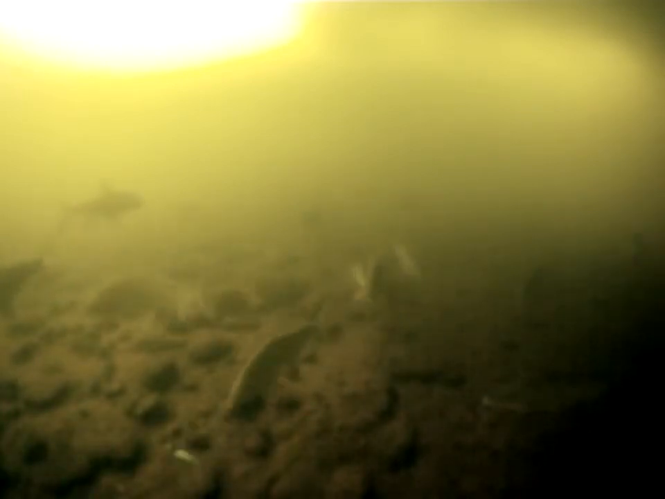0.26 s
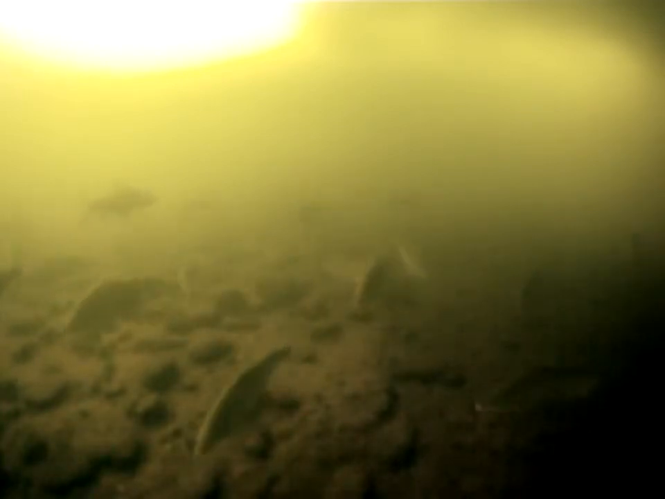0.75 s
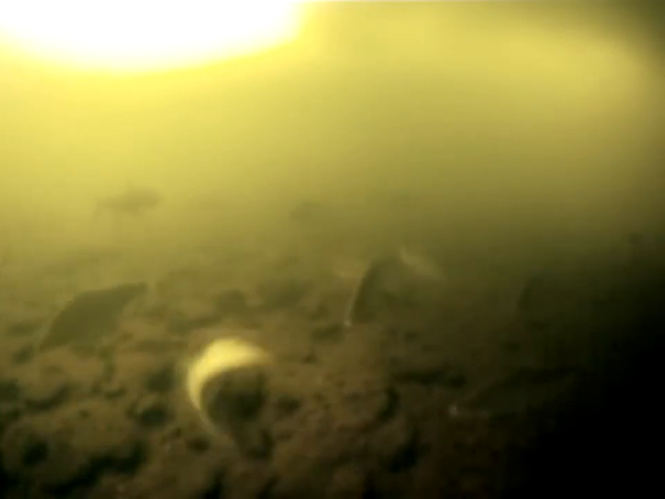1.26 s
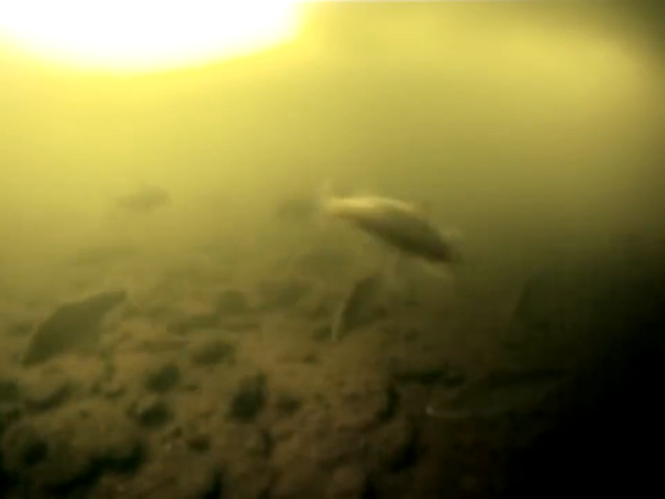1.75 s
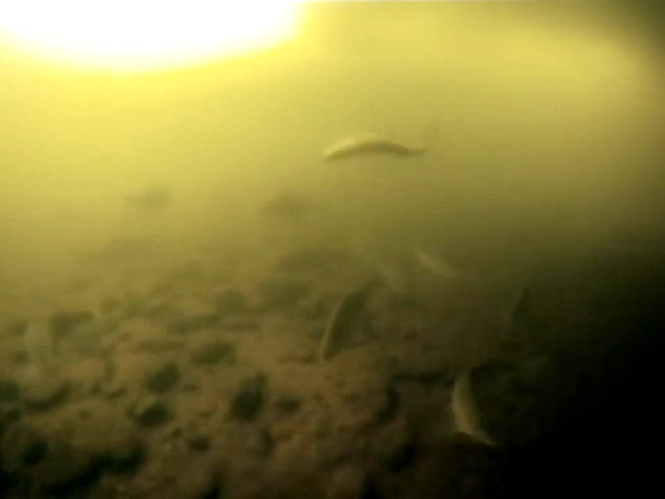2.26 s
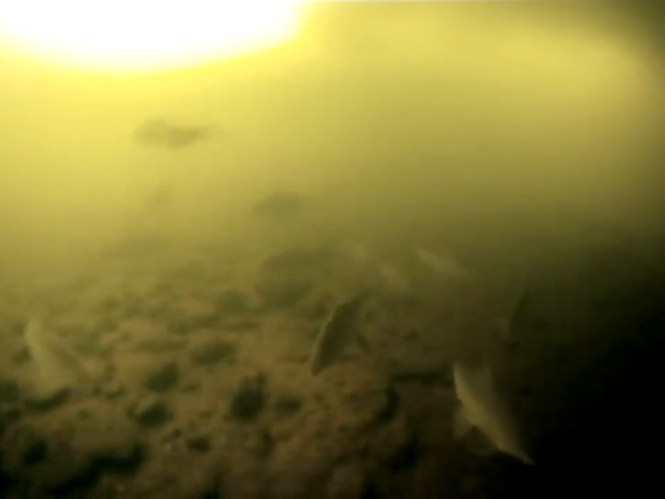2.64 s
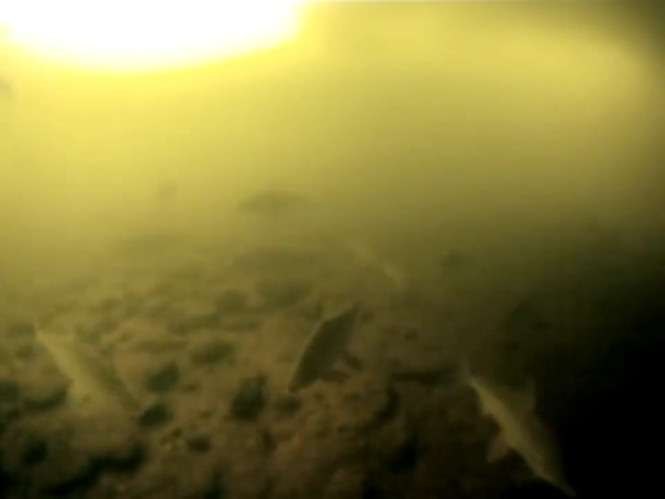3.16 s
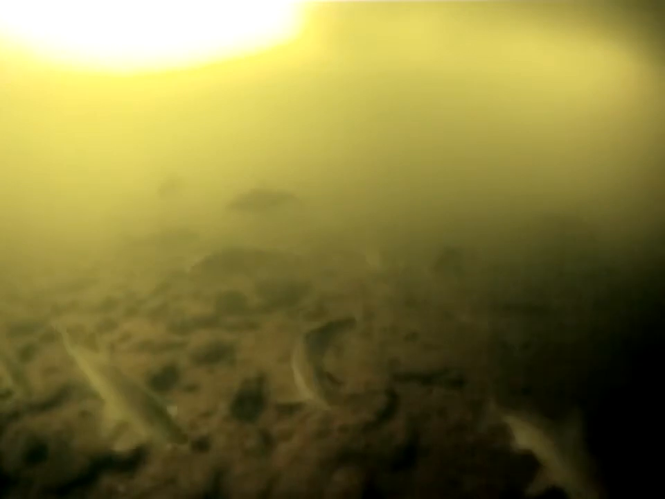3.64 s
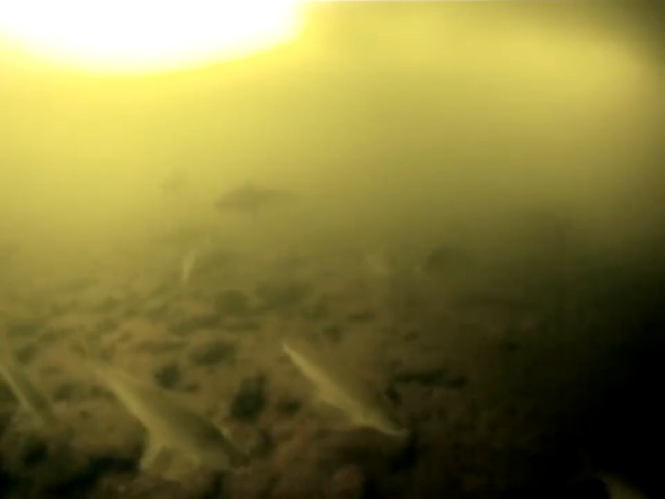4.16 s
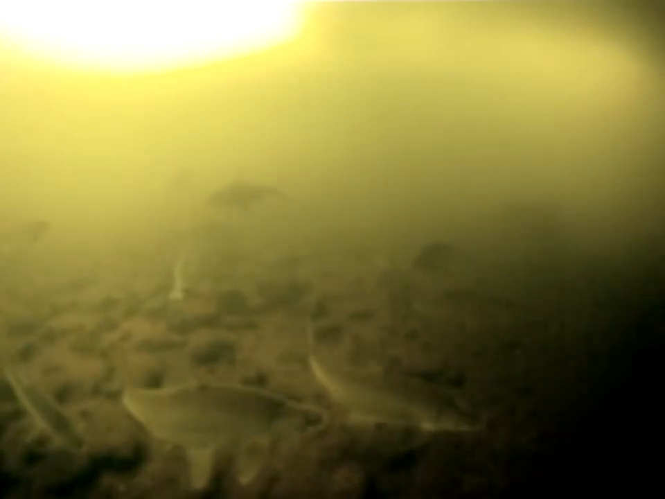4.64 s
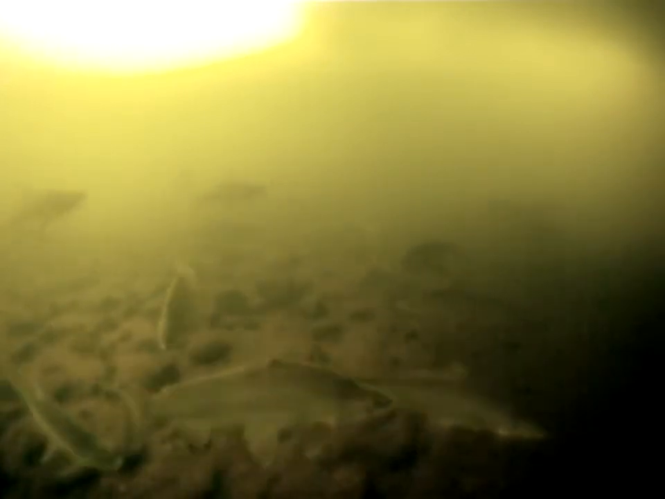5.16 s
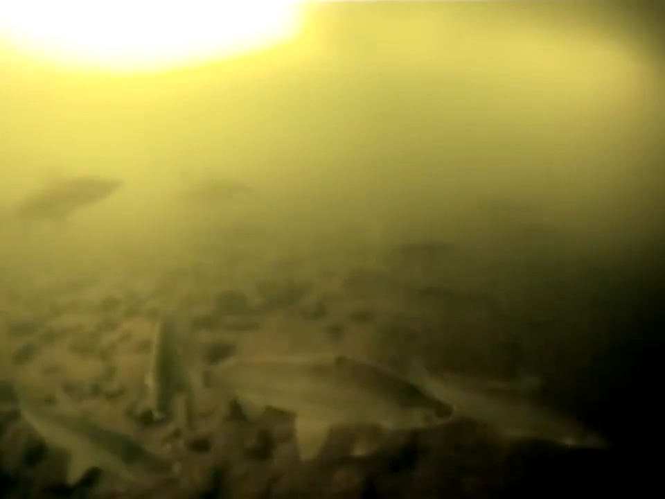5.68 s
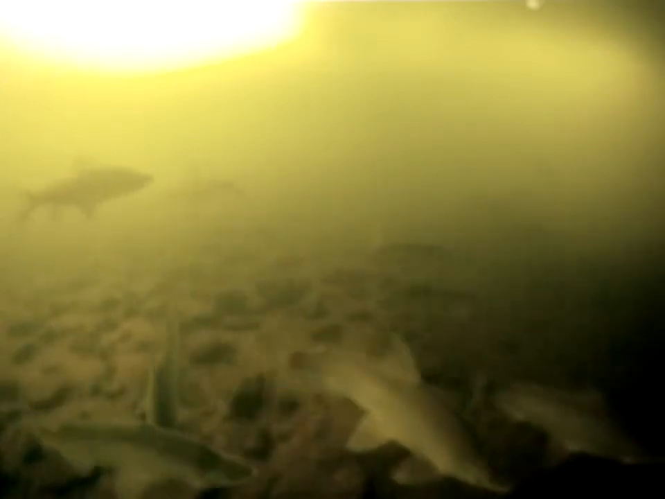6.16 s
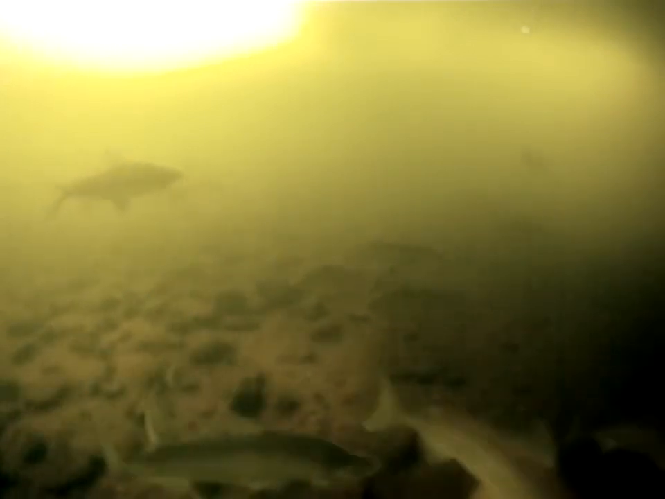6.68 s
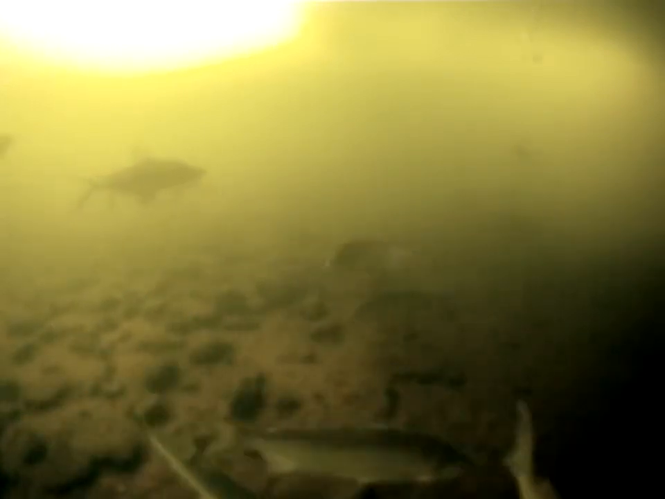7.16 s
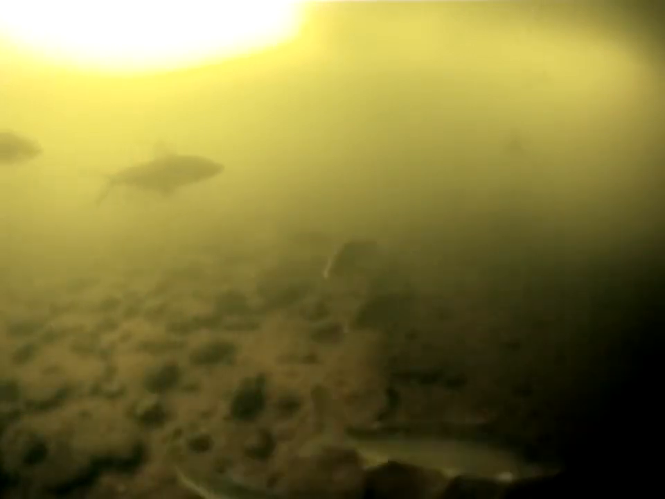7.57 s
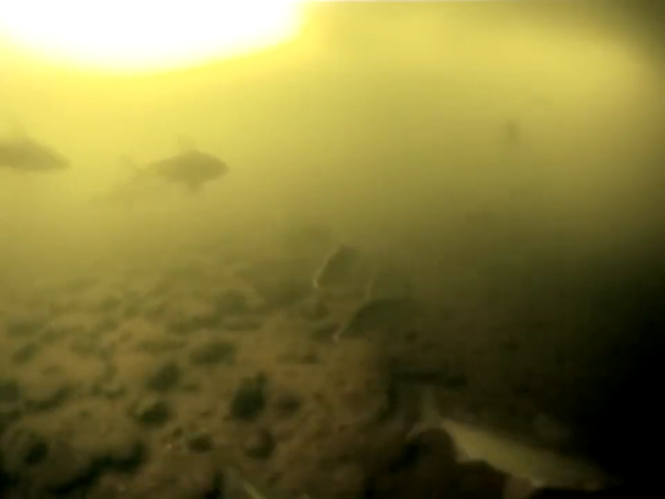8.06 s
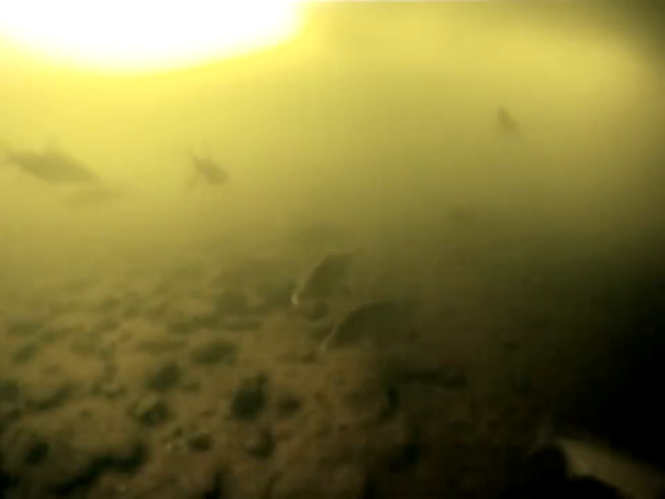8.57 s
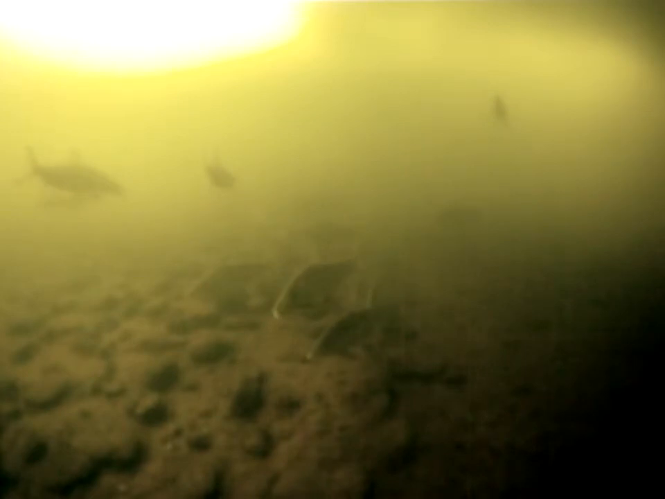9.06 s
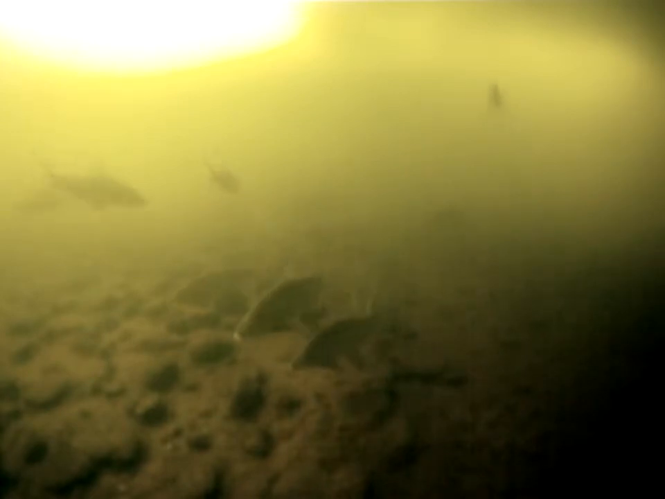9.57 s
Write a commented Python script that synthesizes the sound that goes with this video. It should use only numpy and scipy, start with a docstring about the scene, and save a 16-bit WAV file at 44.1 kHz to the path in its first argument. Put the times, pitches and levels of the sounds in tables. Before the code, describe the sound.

Underwater beneath ice, faint ticks and soft hollow bumps sound over a quiet hiss. Water briefly gurgles and slops with low thuds, then settles. From about halfway, a cable knocks against a plastic housing in an irregular run of loud, sharp clicks, with light scrapes and a thin metallic ring near the end. The microphone is inside the housing, so everything sounds very close, with a gritty, lo-fi treble.

```python
"""Camera under lake ice

A small underwater camera hangs on its cable. Hard ticks and soft bumps along the cable ring its plastic
housing, water slops in the ice hole with low thuds, and the cable scrapes now and then, over preamp hiss.
The camera samples slowly and holds each sample, which mirrors every sound into the treble."""
import sys
import numpy as np
from scipy import signal
from scipy.fft import rfft, irfft
from scipy.io import wavfile
from scipy.ndimage import uniform_filter1d

SR = 44100
rng = np.random.default_rng(int(sys.argv[2]) if len(sys.argv) > 2 else 0)


def bounce(signal):
    """Save signal as a 16-bit WAV file at the path given by the first command-line argument."""
    frames = np.transpose(np.atleast_2d(signal))
    limited = np.clip(frames, -1, 1)
    pcm = np.round(limited * 32767).astype(np.int16)
    wavfile.write(sys.argv[1], SR, pcm)


N = 433048
TIME = np.arange(N) / SR

# The modes, or natural tones, of each part of the housing:
# (pitch [Hz], level [dB], ring time [s], size and direction of the first swing [factor])
SHELL = [(2004, -3, 0.019, -0.69), (2195, 11, 0.01, 1), (2050, -10, 0.017, 0.31)]
PLATE = [(1348, 0, .0098, -1), (1095, -11, .0102, -1), (1770, -15, .009, -1), (830, -19, .009, 1)]
LENS = [(2835, -4, 0.0062, 0.4), (3075, -3.5, 0.0063, -0.53), (4200, -10, 0.0071, -0.41),
        (4940, -4, 0.005, 0.53), (5286, -3.5, 0.0032, 0.83)]
RIM = [(3550, 1.5, 0.011, -0.34), (3243, -7, 0.009, 0.98)]
CAVITY = [(699, -4, 0.026, -1.4), (612, 2.5, 0.0075, 0.87), (800, -22.5, 0.007, 0.86)]
MOUNT = [(261, 0, 0.011, -1)]
# How restless the water round the housing is: (time [s], level [dB])
WASH_LEVELS = [(0.0, -72.5), (1.37, -68), (1.5, -50), (1.78, -61), (1.97, -57), (2.11, -64.5),
               (2.51, -61.5), (3.25, -66), (4.49, -70.5), (5.3, -66.5), (5.99, -58), (6.27, -61.5),
               (6.48, -66.5), (6.9, -66), (7.22, -60.5), (7.55, -70.5), (8.56, -60.5), (9.0, -68.5),
               (9.25, -66), (9.82, -59)]


def undb(db):
    """Turn a level in dB into a gain."""
    return 10 ** (np.asarray(db, float) / 20)


def add(out, s, x):
    """Mix a short sound in at s seconds."""
    i = max(int(s * SR), 0)
    out[i:i + len(x)] += x[:N - i]


def unit(x):
    """Scale a sound to an average strength (rms) of 1."""
    return x / np.sqrt(np.mean(x ** 2))


def coloured(points):
    """Noise whose spectrum follows (frequency [Hz], level [dB]) points."""
    hz, db = np.transpose(points)
    bins = np.arange(1, N // 2 + 2) * SR / N
    gain = undb(np.interp(np.log(bins), np.log(hz), db))
    return unit(irfft(rfft(rng.standard_normal(N)) * gain, N))


def wander(per_s):
    """A curve that glides to a new random value per_s times a second."""
    step = int(SR / per_s)
    held = np.repeat(rng.standard_normal(N // step + 1), step)
    return 1.7 * uniform_filter1d(held, step)[:N]


def strays(per_s, spreads):
    """Rows of events at random times, each value drawn round its average."""
    count = int(per_s * N / SR)
    mean, spread = np.transpose(spreads)
    times = rng.random(count) * N / SR
    return np.column_stack([times, mean + spread * rng.standard_normal((count, len(mean)))])


def ring(modes, chance=np.zeros(10), push_s=0.00014, detune=0.007, scatter_db=3.0,
         bend=1.6, length=1, rise_cycles=0.5):
    """One blow on a part, with peak 1; chance nudges the level and pitch of each mode."""
    t = TIME[:SR // 6]
    x = 0
    for k, (hz, db, ring_s, swing) in enumerate(modes):
        # like a cluster of close tones, it holds, drops as they fall out of step and leaves a faint tail
        fade = undb(-60 * (t / ring_s / length) ** bend) + undb(-24 - 30 * t / ring_s)
        rise = 1 - np.exp(-hz * t / rise_cycles)
        tone = np.sin(2 * np.pi * hz * (1 + detune * chance[5 + k]) * t)
        x = x + swing * undb(db + scatter_db * chance[k]) * fade * rise * tone
    x = np.convolve(x, np.hanning(int(push_s * SR) + 3))  # a longer push is a softer contact
    return x / np.abs(x).max()


def grit(modes, grain_db=1.6, length=1):
    """A stream of tiny blows on a part; more grain_db makes it more uneven."""
    blows = rng.standard_normal(N) * undb(grain_db * wander(250))
    return unit(signal.fftconvolve(blows, ring(modes, length=length))[:N])


def water_wash():
    """Restless water gurgles round the housing and jostles its mount."""
    # The water's deep rumble: (frequency [Hz], level [dB])
    spectrum = [(15, -10.5), (30, 1.5), (60, -4.5), (110, -2.5), (200, -7.5), (350, -10), (700, -18.5),
                (1200, -34), (3000, -79)]
    wash_db = np.interp(TIME, *np.transpose(WASH_LEVELS))
    gurgle = undb(wash_db + 2 * wander(14)) * coloured(spectrum)
    jostle = undb(-49.5 + 0.5 * wash_db + 3 * wander(31)) * grit(MOUNT, 3.0)
    return gurgle + jostle


def shell_creak():
    """The plastic shell creaks faintly all the time."""
    return undb(-80 + 2.9 * wander(30)) * grit(SHELL, 2.6)


def preamp_hiss():
    """The microphone's amplifier hisses steadily."""
    # The amplifier's own noise: (frequency [Hz], level [dB])
    spectrum = [(12, -31.5), (20, -0.5), (175, -9.5), (242, -8), (702, -9), (825, -12), (1810, -14),
                (2080, -14), (2560, -16.5), (5000, -17), (6500, -27.5)]
    return undb(-64) * coloured(spectrum)


def hollow_knocks():
    """The housing's lower modes ring: soft bumps on their own, and the deep body under hard ticks."""
    # Low knocks: (time [s], cavity peak [dB], mount [dB over cavity], plate [dB over cavity],
    # cavity ring length [share of its full ring])
    knocks = [(0.141, -51.5, -4, -7, .8), (0.1702, -50, -1, -20, 0.91), (0.699, -49, -27, 3.5, 0.61),
              (0.973, -33.5, -19, -33, 1), (1.002, -33, -36, -23, .9), (1.108, -54, -20, -20, 1),
              (1.324, -32.5, -11, -15, 0.84), (1.342, -28.5, -11, -47, 0.69), (1.392, -52, 6, -16, .7),
              (1.491, -33, 2.5, -24, 0.72), (1.516, -39, 8.5, -9, 0.59), (1.619, -33, -4.5, -32, 1),
              (2.15, -46, -25, 0.5, 1), (2.612, -44.5, -16, -3.5, 0.9), (2.689, -35.5, -9.5, -28, 1),
              (2.719, -35, -21, -22, 0.72), (3.071, -48, -3, -10, 0.99), (3.116, -46, -16, -17, 0.87),
              (3.168, -46, -24, -2, .8), (3.782, -47.5, -23, -3, 0.69), (4.499, -56.5, -20, 5, .7),
              (4.874, -29.5, 1, -19, 0.47), (5.025, -44.5, -31, -2, 0.74), (5.536, -48.5, -3, -17, 0.37),
              (5.551, -55.5, 8, -11, .45), (5.571, -42.5, -3, -15.5, 0.4), (5.604, -47, -10, -2, 0.6),
              (5.748, -25.5, 8.5, -26, 0.68), (5.907, -47, 8, -25, 0.64), (6.109, -48.5, 2.5, -25, 0.76),
              (6.141, -38, -19, -28, 0.98), (6.197, -57.5, 10, 2, 0.64), (6.279, -54.5, -22, -12, 0.86),
              (6.388, -55.5, -3, -10, 0.52), (6.4144, -48, -22, -2, 0.81), (6.7, -56.5, 8, -15, 0.48),
              (6.803, -54, -12, -14, 0.56), (6.843, -56.5, -10, -14.5, 0.53), (7.065, -14, -19, -34, 0.49),
              (7.207, -47.5, 6, -12, 0.45), (7.248, -52.5, -2, -11, .6), (7.362, -46.5, 4.5, -3, 0.51),
              (7.4077, -52, 2, -11, 0.43), (7.4848, -43.5, 1.5, 0, 0.65), (7.551, -57, 2.5, -23, .7),
              (7.625, -47, -5, -32, 0.94), (7.672, -51.5, -4, -27, 0.61), (7.807, -51, 4, -25, .7),
              (7.916, -47.5, 3.5, -25, 0.53), (7.987, -43.5, -14, -2.5, 0.73), (8.098, -51.5, 4, -24, 0.56),
              (8.433, -59, 16, -23.5, .7), (8.465, -62, 22.5, 8, .7), (8.573, -35, -30, -20, 0.72),
              (8.589, -42, -14, -15.5, 0.64), (8.596, -38.5, 6.5, -3, 0.58), (8.617, -41, -18, -13, 0.94),
              (8.638, -47, -15, -15, 0.54), (8.65, -59.5, 20, -5, .7), (8.669, -56, 19.5, -5, .7),
              (8.691, -57, 15, -23.5, 0.64), (8.743, -47.5, 5, -25, .7), (8.8016, -45.5, -5, -5, 0.64),
              (8.823, -42.5, -31, -2, 1), (8.875, -51, 1, -11, .7), (9.326, -46, 2.5, -7, 0.45),
              (9.339, -44, 10, -11, .7), (9.504, -44, 8, -1.5, 1), (9.6735, -53, 9, 4, 0.6),
              (9.71, -53.5, 8.5, 3.5, 0.63)]
    out = np.zeros(N)
    for s, db, mount_db, plate_db, length in knocks:
        chance = rng.standard_normal((3, 10))
        cavity = ring(CAVITY, chance[0], push_s=0.0016, detune=0.023, rise_cycles=1, length=length)
        mount = ring(MOUNT, chance[1], push_s=0.0026, detune=0.033)
        plate = ring(PLATE, chance[2], push_s=0.00089, detune=0.0068, scatter_db=9.5)
        add(out, s, undb(db) * cavity)
        add(out, s, undb(db + mount_db) * mount)
        add(out, s, undb(db + plate_db) * plate)
    return out


def hard_ticks(slide_s=0.0035, rattle_s=0.028, buzz_s=0.062, fizz_s=0.04, linger_s=0.14):
    """Each tick rings the housing, slides on for a moment and leaves loose parts rattling faintly."""
    # Ticks: (time [s], shell peak [dB], then plate, lens, rim and collar [dB over shell])
    ticks = [(0.474, -54, -24, -20, -26, -20), (0.901, -40.5, -34, -30, -32, -13),
             (1.153, -50.5, -9, -5, -13, -20), (1.369, -53, -24, -20, -26, -20),
             (1.392, -53.5, -20, 5, -5, -20), (1.421, -46, 0.5, -6, -16, 7), (1.4925, -43.5, -8, 0, -2, -4),
             (1.558, -52, -24, -17, -26, -20), (1.605, -40, -18, -24, -28, -14),
             (1.69, -52, -16, -10, -24, -16), (1.743, -41.5, -8, -2.5, -14, -11),
             (1.756, -37, -7, -7.5, -16, -5.5), (1.928, -44, -34, -11, -14, -27),
             (2.183, -53, -20, -14, -18, -20), (2.531, -40.5, -10, -9, -23, -4.5),
             (2.72, -52.5, -12, -12, -24, -20), (2.792, -50.5, -25, -20, -24, -20),
             (2.984, -45.5, 1, -5, -3.5, -20), (3.525, -32.5, -12.5, -3.5, -10, -27),
             (3.6783, -49.5, -27, -6, -17, -22), (3.945, -51.5, -18, -7, -15, -20),
             (4.401, -55, -24, -18, -26, -24), (4.786, -54.5, -24, -20, -26, -25),
             (4.908, -37, -8.5, 4, 3.5, -18), (4.9121, -6.5, -5.5, -12, -18, -23),
             (4.927, -32, -6.5, 0, -1.5, -12), (5.27, -54, -13.5, -7, -10.5, -20),
             (5.7472, -2.5, 7, 6, -21, -17), (5.8686, -45, -1, 3, 5, -13), (5.893, -42, -11, -3, 8, -20),
             (5.906, -4, -16, -6, -4.5, -25), (5.9668, -48, -3, -3, -5, -20),
             (5.9794, -37, -11, -12, -24, -11), (6.0069, -46.5, 3.5, -20, -24, -4),
             (6.0723, -51, 0.5, -9, -14, -14), (6.1087, -16, -9.5, 3.5, -1, -23),
             (6.2133, -54.5, -3, 10, 1, -11), (6.2966, -50.5, -19, -7, -14.5, -20),
             (6.4368, -36.5, -21, -32, -30, -24), (6.4772, -35, -22, -16, -9, -2),
             (6.5253, -48.5, -23, -22.5, -24, -20), (7.039, -53, -14, -6, -8.5, -20),
             (7.0647, -3.5, 3, -0.5, -6.5, -8), (7.08, -10, -7.5, -10.5, -13.5, -24),
             (7.2205, -51, -26, 11, 16, -20), (7.362, -35, -20, 1.5, -7, -22),
             (7.4879, -27.5, -10, -3, -19, -25), (7.497, -47, 0, 2, -10, -13),
             (7.5504, -37, -11, 1.5, -15, -9), (7.618, -50, -9, 10, 0, -14),
             (7.6244, -22, -24, 0.5, -30, -35), (7.672, -34, -24, 2, -12, -19.5),
             (7.8061, -5.5, -10, -14.5, -20, -28), (7.8153, -11, -10, -11.5, -17.5, -24.5),
             (7.9155, -19, -18.5, -6.5, -12.5, -37), (7.96, -49, -3, -8, -8, -14),
             (8.0565, -40.5, -26, -2, -1.5, -24), (8.0972, -14, -14, -10, -14.5, -36),
             (8.162, -47.5, -25, -9, -11, -24), (8.196, -44, -18, -20, -25, -14),
             (8.2228, -39, -12, -1, -10, -12), (8.2629, -38.5, -10, -4.5, -13, -19.5),
             (8.4326, -8.5, -8, -8.5, -14, -28), (8.566, -49.5, 4, -2.5, -4, -16),
             (8.5734, -23, -18, -13, -10, -14), (8.5905, -43, -16.5, -15, -12, -20),
             (8.596, -36, -11, -17, -18, -16), (8.6195, -41, -8, -8, -7, -20),
             (8.6607, -37.5, -18, -6, -8, -20), (8.6665, -49, -16, -6, -10, -20),
             (8.6887, -10, -13, -3, -7, -40), (8.742, -29.5, -11, -0.5, -8, -11),
             (8.8025, -47, -10.5, -5, -13.5, -16), (9.2439, -49.5, -8.5, 2, -12, -12),
             (9.3327, -37, -24, -7.5, -16, -12), (9.5027, -34, -14, -4, -12, -9),
             (9.5606, -43, -3, -12, -16, -13)]
    # The same five levels for faint ticks at random times: (average [dB], spread [dB])
    faint_levels = [(-64, 2), (-16, 5), (-12, 5), (-20, 5), (-18, 4)]
    # Modes of the collar and of the shell's lingering ring:
    # (pitch [Hz], level [dB], ring time [s], first swing [factor])
    collar_modes = [(1547, 0, 0.018, -1)]
    linger_modes = [(2210, -0.5, 0.022, 0.95), (2060, -5, 0.02, 0.89)]
    blows = np.zeros(N)
    shake, shine, buzz, fizz, linger = np.zeros((5, N))  # loudness curves of the after-sounds
    t = TIME[:SR // 2]
    slide = t / slide_s * np.exp(1 - t / slide_s)
    for s, db, plate_db, lens_db, rim_db, collar_db in np.vstack([ticks, strays(1.2, faint_levels)]):
        chance = rng.standard_normal((7, 10))
        cavity = ring(CAVITY, chance[3], bend=3.5, length=0.59)
        mount = ring(MOUNT, chance[4], detune=0.07)
        cavity_db = -20.5 + 0.57 * plate_db  # a tick on the plate also reaches the cavity behind it
        blow = (ring(SHELL, chance[0])
                + undb(plate_db) * ring(PLATE, chance[1], bend=3.5)
                + undb(lens_db) * ring(LENS, chance[2])
                + undb(rim_db) * ring(RIM, chance[5])
                + undb(collar_db) * ring(collar_modes, chance[6], detune=0.021)
                + undb(cavity_db) * (cavity + undb(-21) * mount))
        add(blows, s, undb(db) * blow)
        slide_db = min(-32 - 0.5 * db, -14)  # harder ticks slide less for their size
        loose = undb(db + slide_db) * slide + undb(db - 49) * np.exp(-t / rattle_s)
        add(shake, s, loose)
        add(shine, s, undb(0.44 * max(lens_db, rim_db)) * loose)  # brighter if lens or rim is hit
        add(buzz, s, undb(db + plate_db - 56) * np.exp(-t / buzz_s))  # the plate buzzes on, lower
        add(fizz, s, undb(db + rim_db - 47) * np.exp(-t / fizz_s))  # the rim fizzes on, higher
        add(linger, s, undb(db - 56.5) * np.exp(-t / linger_s))
    rattle = grit(SHELL) + undb(-5) * grit(PLATE)
    bright = grit(LENS[:2]) + undb(-7) * grit(RIM, length=0.75) + undb(-13) * grit(LENS[2:])
    plate_grit = rattle + undb(2.5) * grit(PLATE) + undb(-3) * (grit(CAVITY) + grit(LENS[:2]))
    rim_grit = grit(RIM, 2.0, length=0.6) + undb(-2) * grit(LENS[2:3], 2.5, length=0.45)
    bass_cut = signal.butter(2, 330, "high", fs=SR, output="sos")  # the ticks carry no deep bass
    return (signal.sosfilt(bass_cut, blows) + shake * rattle + undb(-7) * shine * bright
            + buzz * plate_grit + fizz * rim_grit + linger * grit(linger_modes, 0))


def water_slops(glide=0.07, hum_cycles=2.9):
    """A pocket of air under the ice swings up and dies in a few cycles, with two weaker tones above."""
    # Slops in the ice hole: (time of the crest [s], level [dB], pitch [Hz])
    slops = [(1.13, -52, 170), (1.152, -58, 121), (1.367, -48, 99), (1.528, -33, 138), (1.58, -35, 72),
             (1.599, -26.5, 102), (1.691, -36.5, 100), (1.811, -38, 94.5), (1.887, -38, 72),
             (1.934, -48, 110), (1.959, -39.5, 74), (2.074, -44.5, 69), (2.132, -42, 99), (2.252, -47, 101),
             (2.351, -42.5, 93), (2.418, -49.5, 83), (2.495, -48, 100), (2.551, -48, 118), (2.622, -47, 94),
             (2.666, -50, 110), (2.832, -49, 89), (2.949, -47, 107), (3.026, -50, 108), (3.091, -49, 101),
             (3.221, -51.5, 75.4), (3.942, -50, 96), (4.877, -42, 93.3), (5.397, -49.5, 133),
             (5.444, -49, 113), (5.472, -52.5, 130), (5.752, -46.5, 107), (5.894, -42.5, 97.3),
             (6.227, -51, 89.4), (6.392, -50, 121), (6.852, -58, 130), (6.968, -50, 86.6),
             (7.117, -46, 129), (7.264, -48.5, 117), (7.82, -46, 109), (8.443, -44.5, 98),
             (8.602, -44, 129), (8.699, -51, 127), (9.198, -49, 102.4), (9.341, -39.5, 120),
             (9.538, -45, 87.5), (9.71, -52, 103.5)]
    # Faint slops at random times: (average, spread) of level [dB over the wash], then of pitch [Hz]
    faint_spreads = [(6, 1.7), (105, 18)]
    faint = strays(4, faint_spreads)
    faint[:, 1] += np.interp(faint[:, 0], *np.transpose(WASH_LEVELS))
    out = np.zeros(N)
    for s, db, hz in np.vstack([slops, faint]):
        chance = rng.random(6)
        cycle = TIME[:SR // 6] * hz
        crest = 1.9 * (0.39 + 0.18 * chance[3])  # cycles until the swell peaks
        swell = (cycle / crest * np.exp(1 - cycle / crest)) ** 3.2
        hum = undb(-9) * (1 - np.exp(-(cycle / crest) ** 4)) * np.exp(-cycle / hum_cycles)
        upward_bend = glide * np.log(np.cosh(cycle - crest))  # the pitch rises through the crest
        swing = np.sin(2 * np.pi * (chance[0] + cycle + upward_bend))
        upper = np.sin(2 * np.pi * (chance[1] + (2.6 + 0.8 * chance[2]) * cycle))
        lower = np.sin(2 * np.pi * (chance[4] + (2.0 + 0.6 * chance[5]) * cycle))
        flutter = swell * (undb(-17) * upper + undb(-12) * lower)
        add(out, s - crest / hz, undb(db) * ((swell + hum) * swing + flutter))
    return out


def cable_scrapes(attack_db_per_s=2199, release_db_per_s=1100, grain_db=2.5):
    """The cable sticks and slips, shaking the housing: it bites fast, holds and lets go."""
    # Scrapes: (start [s], hold [s], shell level [dB], cavity level [dB over shell])
    scrapes = [(1.423, 0.0078, -53.5, -15), (1.451, 0.012, -50.5, -25), (5.601, 0.0062, -55.5, 3),
               (6.203, 0.053, -63.5, 7.5), (6.435, 0.0028, -61, -9), (6.473, 0.0026, -49.5, -17),
               (7.098, 0.089, -72, 1), (7.213, 0.043, -63, -5), (8.57, 0.094, -50.5, 1),
               (9.246, 0.03, -69.5, -15.5), (9.332, 0.01, -53, 8), (9.384, 0.0092, -63.5, 2),
               (9.686, 0.019, -64, 15)]
    high, low = np.zeros((2, N))
    t = TIME[:SR // 2] - 0.1  # begin early to leave room for the attack
    for s, hold, db, cavity_db in scrapes:
        level = db + attack_db_per_s * np.minimum(t, 0) - release_db_per_s * np.maximum(t - hold, 0)
        add(high, s + t[0], undb(level))
        add(low, s + t[0], undb(level + cavity_db))
    body = grit(SHELL, grain_db) + undb(-3.5) * grit(PLATE, grain_db, length=0.6)
    bright = (grit(LENS[:2], grain_db) + undb(-6) * grit(RIM, grain_db, length=0.61)
              + undb(-11) * grit(LENS[2:], grain_db))
    hollow = unit(grit(CAVITY, grain_db, length=0.46) + undb(-3.5) * grit(MOUNT, 1.5))
    return high * (body + undb(-8) * bright) + low * hollow


def squelch(at_s=1.463, width_s=0.01, high_hz=1480, low_hz=995, drop_s=0.0041):
    """One short, slightly rough tone slides down."""
    t = TIME - at_s
    hz = low_hz + (high_hz - low_hz) * (1 - np.tanh(t / drop_s)) / 2
    phase = np.cumsum(hz * (1 + 0.03 * wander(440))) / SR
    loudness = undb(-44 + 2 * wander(300)) * np.exp(-(t / width_s) ** 2 / 2)
    return loudness * np.sin(2 * np.pi * phase)


def singing_metal():
    """Some ticks set a small metal part singing with a thin tone that outlasts them."""
    # The part's one mode: (pitch [Hz], level [dB], ring time [s], first swing [factor])
    metal_modes = [(2077, 0, 0.073, -1)]
    # When it is struck: (time [s], peak level [dB])
    strikes = [(5.907, -48.5), (7.081, -45.5), (8.098, -48), (8.434, -28.5), (8.689, -27.5), (8.743, -39)]
    out = np.zeros(N)
    for s, db in strikes:
        add(out, s, undb(db) * ring(metal_modes, bend=0.78))
    return out


def scene():
    """All the sounds meet in one channel, that of the microphone inside the housing."""
    steady = water_wash() + shell_creak() + preamp_hiss()
    events = hollow_knocks() + hard_ticks() + water_slops() + cable_scrapes()
    return (steady + events + squelch() + singing_metal())[None]


def record(dry, low_hz=42, high_hz=5500, top_hz=16300):
    """The preamp overloads on loud peaks; the camera filters, samples slowly and holds each sample."""
    band = signal.butter(2, [low_hz, high_hz], "band", fs=SR, output="sos")
    filtered = signal.sosfilt(band, np.clip(dry, -1, 1))
    slow = np.clip(signal.resample_poly(filtered, 40, 147, axis=1), -1, 1)  # 12000 samples a second
    steps = np.repeat(slow, 4, axis=1)  # holding makes stair steps, which add the mirrored treble
    held = signal.resample_poly(steps, 147, 160, axis=1)[:, :N]  # back to SR
    top_cut = signal.ellip(12, 0.2, 90, top_hz, fs=SR, output="sos")
    return signal.sosfilt(top_cut, held)


dry = scene()
out = record(dry)
bounce(out)
```